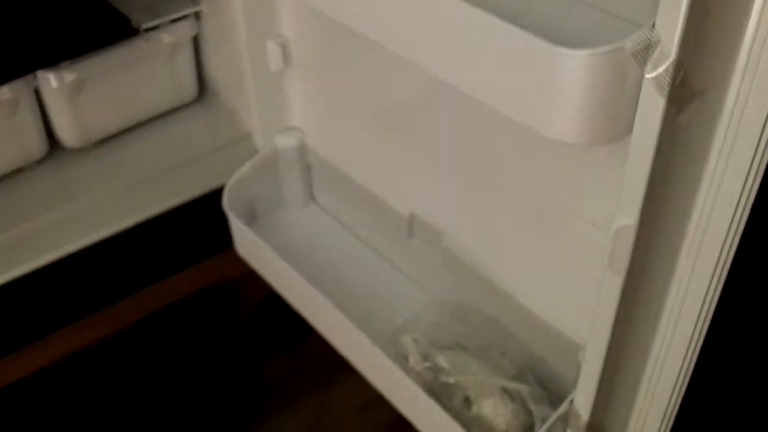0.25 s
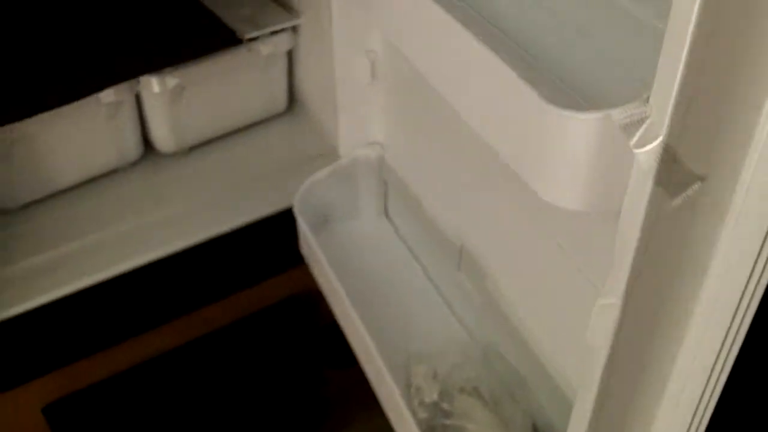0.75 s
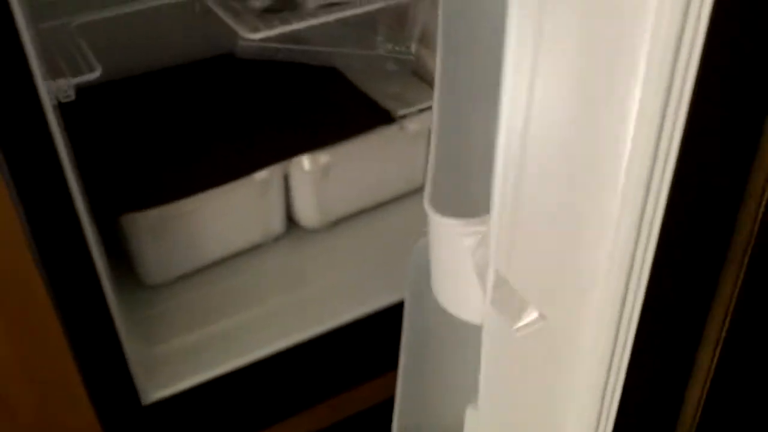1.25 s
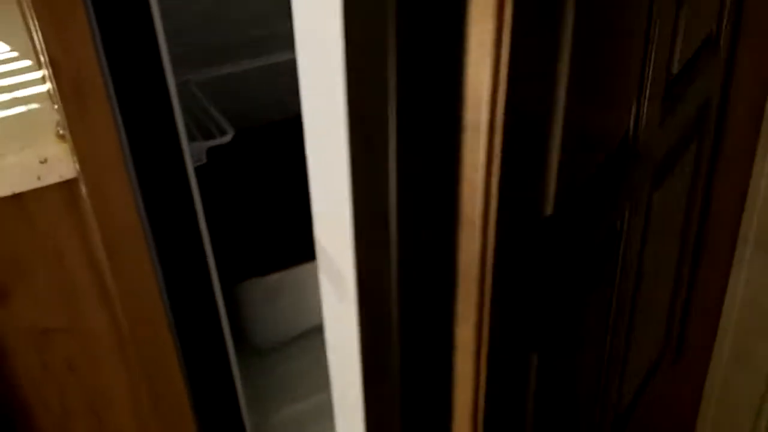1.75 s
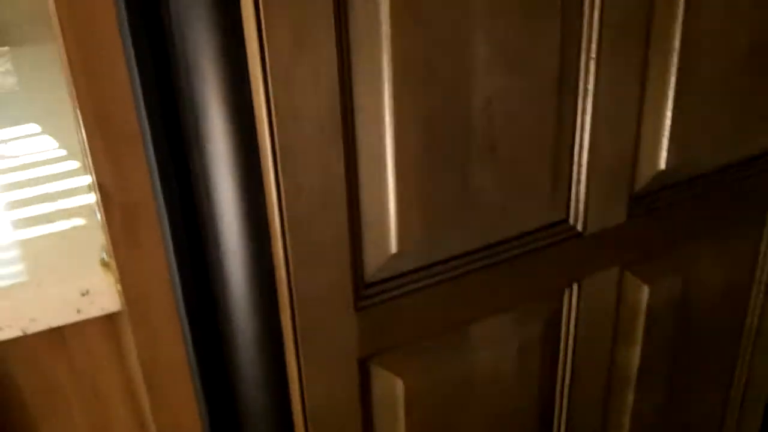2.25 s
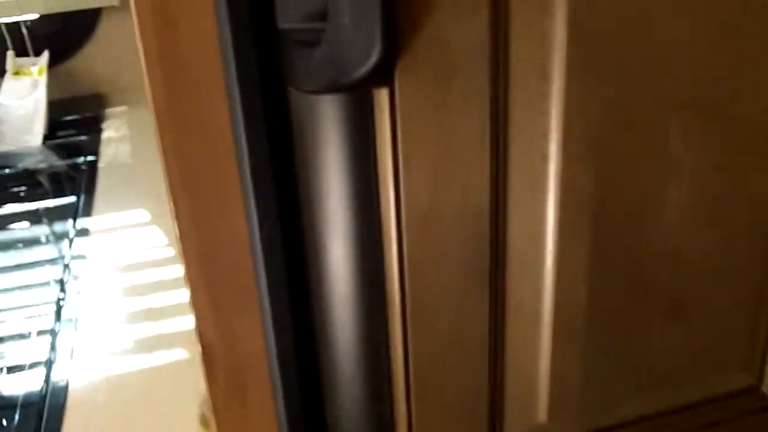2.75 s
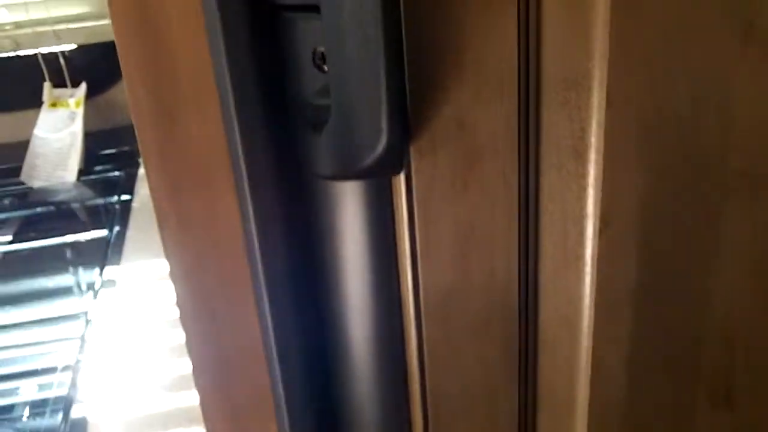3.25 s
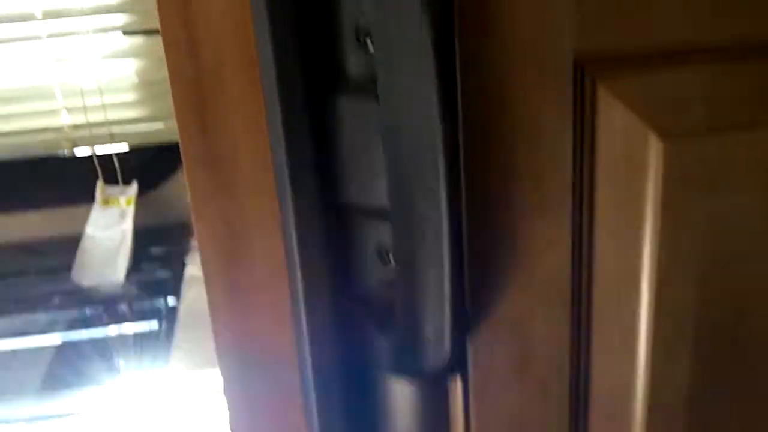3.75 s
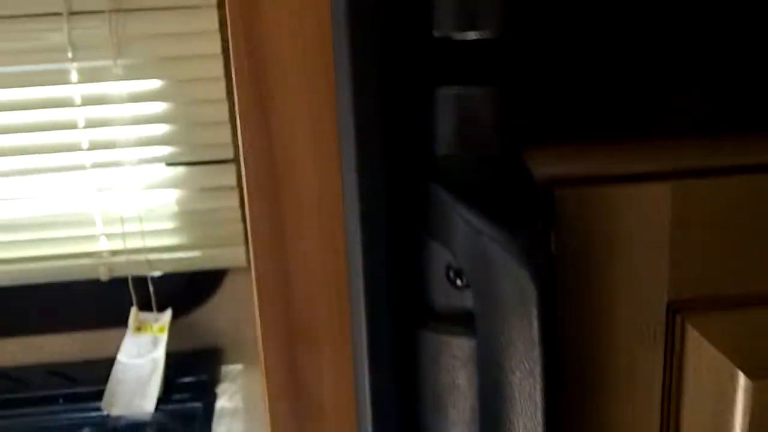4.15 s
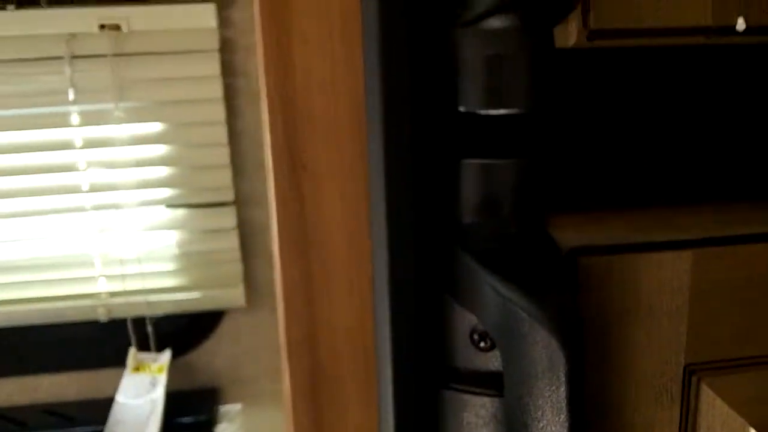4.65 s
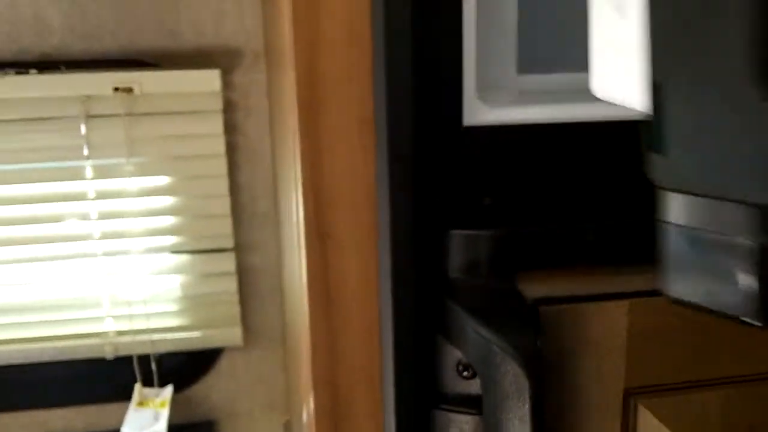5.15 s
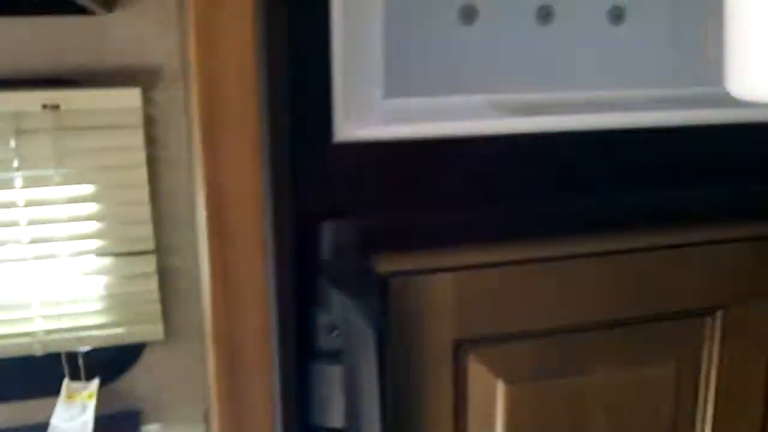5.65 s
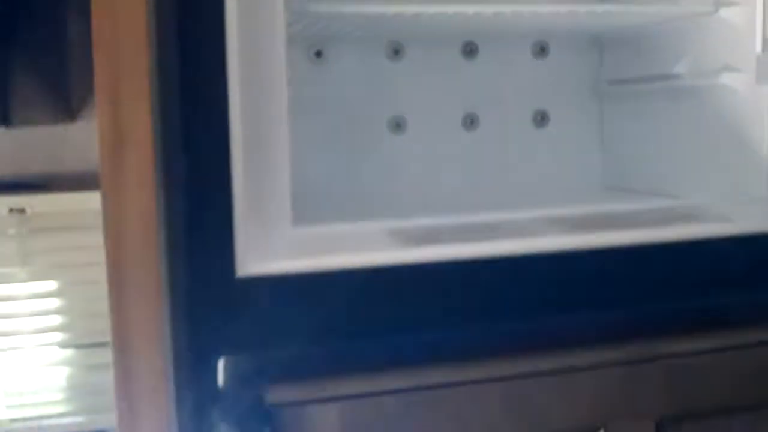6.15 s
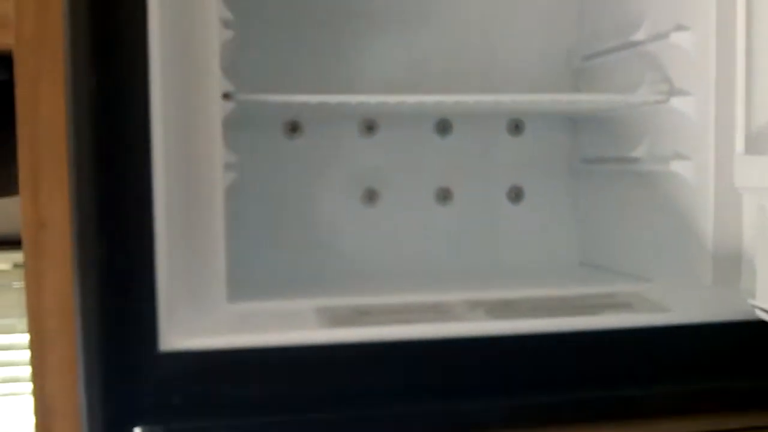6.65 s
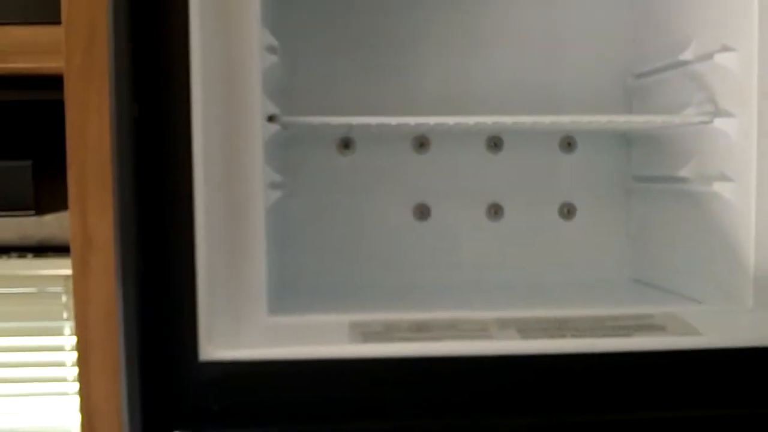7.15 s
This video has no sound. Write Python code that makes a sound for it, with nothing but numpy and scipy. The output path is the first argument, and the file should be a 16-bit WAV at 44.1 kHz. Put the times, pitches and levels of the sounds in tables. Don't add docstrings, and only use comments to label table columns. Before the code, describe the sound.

Close handheld microphone in a small furnished trailer, with soft fan wash, faint hum and low handling rumble. A plastic door bin knocks, the refrigerator door lands dully on its gasket, then a push seats it with a puff of air and a very sharp latch snap. A hand slides faintly up the handle, plastic clicks, the freezer seal peels open with a low thump, and soft knuckle taps land on the hollow liner.

```python
import sys
import numpy as np
from scipy import signal
from scipy.fft import rfft, irfft
from scipy.io import wavfile
from scipy.ndimage import uniform_filter1d

SR = 44100
rng = np.random.default_rng(int(sys.argv[2]) if len(sys.argv) > 2 else 0)


def unload_audio(sound):
    columns = np.transpose(np.atleast_2d(sound))
    steps = np.round(np.clip(columns, -1, 1) * 32767)
    wavfile.write(sys.argv[1], SR, steps.astype(np.int16))


def ratio_of_db(decibels):
    return 10 ** (np.asarray(decibels, float) / 20)


N = 327222
T = np.arange(N) / SR

# (frequency [Hz], level [dB], t60 [s])
BIN_MODES = [(538, -16.5, 0.13), (1080, -9, 0.028), (1700, -7, 0.007), (1840, 3.5, 0.0085),
             (2400, 8, 0.0089), (2700, -16, 0.0075), (3450, -26, 0.0042), (4180, 11.5, 0.0032),
             (4970, 4, 0.0065), (6120, -0.5, 0.0073), (8600, 0, 0.0028)]
DOOR_MODES = [(236, -14, 0.083), (350, -13.5, 0.043), (520, -11.5, 0.02), (714, -0.5, 0.01),
              (950, -3.5, .01), (1380, 4.5, 0.0096), (1800, 0, 0.01), (2610, -1.5, 0.01),
              (3490, 2.5, 0.008), (4450, -9, .008), (5870, -17, 0.0064)]
SEAT_MODES = [(230, -7, 0.047), (383, 2.5, 0.05), (610, -8, 0.023), (800, -6, .025), (1050, 0, 0.025),
              (1355, -1, 0.02), (1690, -9, 0.016), (4470, -6, 0.012), (5000, -8, .01), (5900, -2, .012),
              (6650, 1, 0.0084)]
CATCH_MODES = [(3800, 0, .014), (1500, -12, .01)]
LATCH_MODES = [(1300, -10, 0.017), (1680, -11, 0.022), (2260, -14, .012), (2800, -10, 0.014),
               (2950, -11.5, .012), (3190, -1.5, 0.019), (3510, 1.5, 0.016), (3630, -1.5, 0.018),
               (4240, -9.5, .010), (4610, -12.5, 0.012), (5130, -13.5, 0.011), (5650, 0.5, 0.0092),
               (5938, -4, 0.0062), (6600, -14, .006)]
LATCH_TOP_MODES = [(8640, -10, 0.0062), (10800, 0.5, 0.0037), (12000, 3.5, .008), (13470, 6, 0.0084),
                   (14700, 4, .006), (16200, 13, 0.0094)]
LINER_MODES = [(284, -7.5, 0.14), (336.6, 5, 0.11), (417, -28, 0.066), (525, -14, 0.026), (702, 0, 0.035),
               (806, 3, 0.04), (1200, -1, 0.025), (1488, 6.5, 0.022), (1950, 0, 0.022), (2770, -7, 0.018),
               (3600, -11.5, 0.0098), (4700, -11, .01)]

# (time [s], level [dB], hardness [dB/octave])
BIN_BLOWS = [
    (1.4727, -36, 2),
    (1.4738, -15, 0.5),
    (1.4821, -28, 1),
    (1.49, -38.5, -14),
]
DOOR_BLOWS = [(2.2343, -23, 2.5), (2.2357, -27, 1.5), (2.2375, -22.5, -2), (2.2396, -26.5, -4),
              (2.2415, -34, -1.5), (2.245, -32, 0), (2.2475, -30, 2), (2.25, -33, 4), (2.254, -37, -1),
              (2.2585, -36, 0), (2.282, -43, -2)]
SEAT_BLOWS = [
    (2.9714, -22, 0),
    (2.9748, -24.5, -0.41),
    (2.981, -32, 0),
    (2.995, -28, -1),
]
CATCH_BLOWS = [
    (2.94, -46, 0),
    (2.944, -48.5, 0),
    (2.9485, -44.5, 0),
    (2.9599, -34.5, 0),
    (2.966, -35, 0),
]
LATCH_BLOWS = [
    (3.2273, -27, -3),
    (3.2285, -2.5, 1),
    (3.2295, -8, 1),
    (3.2308, -12, -1),
    (3.2343, -7, 0),
    (3.2347, -9, 0),
    (3.2367, -17, -3.5),
]
LINER_TAPS = [
    (6.451, -32.5, 0.0),
    (6.612, -32, 0.0),
    (6.815, -32, 0.0),
    (7.079, -33, 0.0007),
    (7.216, -41.5, 0.0),
    (7.317, -33, 0.0),
]

# (frequency [Hz], level [dB/Hz])
BIN_RATTLE = [(150, -50), (250, -14), (530, -4.5), (887, -14.5), (2690, -10), (6470, -17.5), (7260, -21),
              (7800, -48), (10100, -82)]
DOOR_RATTLE = [(88, -39), (150, -12), (810, -2.5), (1150, -5.5), (1540, -8), (2620, -3.5), (6500, -18),
               (7800, -35), (10100, -71)]
LATCH_RATTLE = [(180, -43.5), (300, -23), (585, -30), (950, -22), (1400, -8), (2200, -10.5), (3400, -3.5),
                (4000, -11.5), (4900, -10), (5900, -14.5), (7600, -33.5), (10100, -70)]
LINER_RATTLE = [(140, -34), (230, -7), (329, 4), (691, -2), (960, -12), (1780, -13), (4310, -24.5),
                (7000, -59), (9100, -75)]
# (frequency [Hz], level [dB/Hz])
LATCH_ECHO = [(180, -40), (300, -16), (500, -24), (850, -13.5), (1400, -7), (2200, -6), (2900, -1),
              (3700, -3.5), (4600, -6.5), (5900, -9), (7600, -32.5), (10100, -70)]
# (frequency [Hz], level [dB/Hz])
PUFF_TAIL = [(150, -29.5), (250, 5), (310, -20.5), (485, -2.5), (675, -9), (1000, -4), (1350, -8.5),
             (2570, -19.5), (3500, -19), (4400, -13), (6290, -11.5), (7470, -23.5), (7800, -53),
             (10100, -83)]

# (time [s], peak [dB], main ring [Hz], second ring [Hz],
# second ring level [dB])
TICKS = [(2.413, -47, 2100, 1200, -5), (2.4921, -43, 2730, 1480, -11), (2.8446, -45, 2280, 517, -10),
         (2.8999, -37.5, 2940, 1650, -7), (3.5409, -38.5, 2090, 1800, -7), (4.187, -43.5, 2340, 950, -11),
         (4.2182, -34, 3600, 2350, -5.5), (4.3166, -48, 2220, 1200, -2), (4.365, -25.5, 3810, 1560, -11.5),
         (4.3652, -36, 6600, 1910, -4), (4.3712, -35, 3900, 5400, -14), (4.377, -38.5, 1500, 2470, -11),
         (4.388, -49, 4400, 3000, -6), (4.5824, -48, 2200, 3700, -6), (4.634, -36, 3570, 623, -16),
         (4.638, -42.5, 6240, 3830, -3), (4.6664, -47, 4800, 2980, -4), (4.7872, -41, 2430, 721, -11),
         (5.1637, -42.5, 2370, 4170, -11), (5.6755, -48, 3190, 574, -9), (7.216, -40, 2080, 606, -1),
         (7.217, -43.5, 3330, 4600, -5),
         (2.509, -43, 524, 3600, -10), (4.318, -46.5, 1310, 3600, -13), (4.536, -40, 1295, 3730, -19),
              (4.541, -41.5, 1000, 1300, 2), (4.547, -45, 1300, 903, 0), (4.644, -36, 748, 3650, -17),
              (4.7212, -39, 1320, 2180, -6), (4.727, -39, 600, 1000, -3), (4.7475, -31, 1000, 654, 6),
              (4.7515, -46, 1200, 520, 2)]
# (time [s], level [dB], frequency [Hz], t60 [s])
THUMPS = [(2.185, -37, 61, 0.14), (2.241, -49, 120, .2), (2.837, -33.5, 44.8, 0.16),
          (2.974, -34.5, 225, 0.2), (3.228, -39, 216, 0.42), (3.226, -36, 330, 0.056),
          (3.241, -41, 280, .07), (3.262, -31, 169, 0.059), (3.264, -39.5, 260, 0.094),
          (3.308, -43, 250, .1), (4.378, -52, 163.4, 0.34), (4.424, -44, 131, 0.12),
          (4.721, -49, 150.3, 0.57), (4.792, -24.5, 47.3, 0.11), (6.101, -36.5, 68, 0.17),
          (6.098, -43.5, 130, 0.11), (6.105, -37.5, 279.6, 0.061)]

# (peak time [s], level [dB], rise [s], fall [s], low body [dB])
GASKET = [(1.598, -52, 0.041, 0.047, -2), (2.19, -60, 0.026, .03, -18), (2.2, -53, 0.026, 0.04, -8),
          (2.844, -55, 0.013, 0.024, -13), (2.902, -46.5, 0.011, 0.021, -14),
          (2.885, -55.5, .01, .015, -4.5), (2.915, -51.5, .015, 0.017, -1), (2.93, -51, .015, 0.017, 2),
          (2.95, -47.5, 0.026, .02, -4.5), (2.966, -45.5, 0.03, 0.0044, 3.5),
          (4.638, -47.5, 0.0084, 0.02, 3), (4.69, -59, 0.12, 0.086, -5), (5.03, -67, 0.75, 0.075, 11.5)]
# (peak time [s], level [dB], rise [s], fall [s], low body [dB])
PEEL = [(4.711, -56.5, .03, .03, -11), (4.723, -47.5, .004, .04, 1), (4.742, -57, 0.027, 0.033, -6),
        (4.757, -48, 0.033, 0.027, -1), (4.768, -46.5, 0.027, 0.023, -14), (4.781, -46, .012, 0.022, -3),
        (4.787, -40.5, 0.014, 0.01, -4), (4.795, -46.5, 0.0072, 0.016, -1), (4.803, -57, .006, 0.023, -5)]
# (frequency [Hz], level [dB/Hz])
GASKET_TONE = [(180, -6), (300, -9), (490, -13.5), (653, -4.5), (834, -10), (943, -10.5), (1480, -9.5),
               (1810, -11.5), (4520, -16.5), (7800, -37), (10100, -46), (17200, -120)]
# (peak time [s], level [dB], rise [s], fall [s], brightness [dB])
SLIDE = [(3.85, -57.5, 0.034, 0.047, -21), (3.96, -71, 0.068, 0.089, -21), (4.08, -61, 0.19, 0.21, -4.5),
         (4.19, -58, .01, .009, -30.5), (5.675, -60, .02, 0.033, -8), (7.18, -64, 0.038, 0.027, -4),
         (7.216, -57.5, .005, 0.03, 1)]
# (frequency [Hz], width [Hz], level [dB])
HANDLE = [(2350, 400, -5), (2716, 300, -6.5), (3900, 1350, -5), (5000, 970, -2), (6020, 500, -5)]
# (time [s], frequency [Hz], level [dB])
SQUEAK = [(3.82, 2350, -91.5), (3.85, 2350, -71), (3.89, 2400, -68), (3.91, 2350, -78), (3.95, 2350, -69),
          (4.02, 2400, -66), (4.06, 2350, -68), (4.111, 2290, -62), (4.16, 2270, -80)]
# (peak time [s], level [dB], rise [s], fall [s], groan over drag [dB])
DRAG = [(2.28, -62.5, 0.012, 0.093, 11.5), (2.33, -75.5, 0.069, 0.089, 20), (2.925, -57.5, .03, .02, 2),
        (2.945, -52.5, 0.046, .02, 5.5), (4.235, -72.5, .006, 0.12, 14), (4.318, -78, 0.037, 0.056, 6),
        (4.395, -73.5, .006, 0.086, 20.5), (4.5, -72.5, 0.24, 0.51, 12)]
# (frequency [Hz], level [dB/Hz])
GROAN = [(90, -31), (140, 10), (300, 5), (450, -4), (900, -46)]

# (frequency [Hz], level [dB/Hz])
WASH = [(76, -47), (130, 0.5), (152, -0.5), (225, -12.5), (277, -3), (323, -6), (448, -7), (488, -8),
        (620, -8.5), (1000, -4.5), (1280, -8), (2180, -12.5), (5800, -21.5), (7900, -30.5), (10300, -85.5),
        (17400, -120)]
# (frequency [Hz], level [dB/Hz])
RUMBLE_TONE = [(4.7, -44), (8.0, 3.5), (27, -1), (49, -4), (92, -8), (114, -18), (151, -27), (200, -16.5),
               (260, -61.5), (440, -120)]
# (peak time [s], level [dB], rise [s], fall [s])
JOLTS = [(2.5, -48, 0.51, 0.24), (3.04, -41.5, 0.31, 0.62), (3.6, -54.5, .6, 1.6), (4.92, -47.5, .6, 0.54),
         (5.6, -54.5, 1, 0.52), (6.1, -50, 0.13, 0.59), (7.2, -55, 0.94, 0.73)]
# (time [s], level [dB])
HUM = [(0, -87), (.8, -72), (2, -67.5), (3.3, -67.5), (5.2, -71.5), (7.42, -85.5)]
# (frequency [Hz], t60 [s])
ROOM = [(100, 0.5), (300, 0.22), (1000, 0.33), (3000, 0.24), (6500, 0.18), (12000, 0.15)]
# (frequency [Hz], level [dB])
RESPONSE = [(6800, 0.5), (7300, -0.5), (7700, -12), (8600, -4.5), (14500, -19), (16500, -43), (17000, -76)]
# (frequency [Hz], level [dB/Hz])
HISS = [(7400, -43.5), (8000, -17.5), (8600, -6.5), (10200, -3.5), (11600, -3.5), (11900, -17), (12200, -3),
        (14600, -2.5), (15250, -6.5), (15500, -40.5)]

WASH_DB, SETTLE_DB, SETTLE_S = -59, -0.5, 0.12
DRIFT_DB_PER_S = 0.276
REST_DB = -56.5
HUM_HZ, HISS_DB = 221.4, -73.5
PUFF_S, PUFF_DB, PUFF_CRACK_DB = 2.9712, -10.5, -7.5
STROKE_DB = 20


def evened(x):
    return x / np.sqrt(np.mean(x ** 2) + 1e-20)


def read(points, hz):
    f, value = np.transpose(points)
    return np.interp(np.log(hz + 1), np.log(f + 1), value)


def add(mix, s, sound):
    part = mix[round(s * SR):][:len(sound)]
    part += sound[:len(part)]


def colour(x, points):
    hz = np.fft.rfftfreq(len(x), 1 / SR)
    return irfft(rfft(x) * ratio_of_db(read(points, hz)), len(x))


def resonate(x, hz, width_hz):
    turn = np.exp(2j * np.pi * np.cumsum(hz * np.ones(len(x))) / SR)
    pole = np.exp(-np.pi * width_hz / SR)
    return 2 * (turn * signal.lfilter([1 - pole], [1, -pole], x / turn)).real


def patchy(points, patch_db):
    a, b, patches = rng.standard_normal((N // 256 + 5, 513, 3)).T
    patches = uniform_filter1d(patches, size=10, axis=0)
    patches = evened(uniform_filter1d(patches, size=12, axis=1))
    z = (a + 1j * b) * ratio_of_db(patch_db * patches)
    noise = signal.istft(z, nperseg=1024, noverlap=768)[1][:N]
    return evened(colour(noise, points))


def swell(s, db, rise_s, fall_s):
    return ratio_of_db(db - STROKE_DB * np.maximum((s - T) / abs(rise_s), (T - s) / abs(fall_s)))


def strokes(rows, main, extra):
    return sum(swell(*row[:4]) * (main + ratio_of_db(row[4]) * extra) for row in rows)


def slips(per_s, size_db):
    size = ratio_of_db(size_db * np.minimum(rng.exponential(1, N), 4)) * rng.standard_normal(N)
    return size * (rng.random(N) < per_s / SR)


def room(x, lasting):
    taps = np.zeros(SR // 2)
    at = np.arange(120, len(taps) - 12, 12)
    taps[at + rng.integers(0, 12, len(at))] = rng.choice([-1., 1.], len(at))
    hz, t, z = signal.stft(taps, SR, nperseg=256)
    decay = ratio_of_db(-60 * t / lasting / read(ROOM, hz)[:, None])
    tail = signal.istft(z * decay, SR, nperseg=256)[1]
    return signal.oaconvolve(x, tail / np.linalg.norm(tail))[:N]


def struck(modes, blows, rattle, rattle_db, rattle_s, rise_s, wet_db, luck_db=-2.5, echo=None):
    near, far, t = np.zeros(N), np.zeros(N), T[:SR // 8]
    hz, db, t60 = np.transpose(modes)[:, :, None]
    rise = 1 - np.exp(-t / rise_s)
    click = colour(1. * (np.arange(1024) == 200), echo or rattle)
    click /= np.linalg.norm(click)
    for s, blow_db, hard_db in blows:
        luck = luck_db * rng.standard_normal((2, len(modes), 1))
        level = ratio_of_db(db + hard_db * np.log2(hz / 1500) + luck[0] - 60 * t / t60)
        ring = (level * np.sin(2 * np.pi * hz * (1 + 0.0027 * luck[1]) * t)).sum(0) * rise
        shake = evened(colour(rng.standard_normal(len(t)), rattle)) * np.exp(-t / rattle_s) * rise
        add(near, s, ratio_of_db(blow_db) * (ring / abs(ring).max() + ratio_of_db(rattle_db) * shake))
        add(far, s, ratio_of_db(blow_db + wet_db) * click)
    return np.array([near, far])


def background():
    wash_db = WASH_DB - 3.0 + SETTLE_DB * np.exp(-T / SETTLE_S) + DRIFT_DB_PER_S * T
    wash = ratio_of_db(wash_db) * patchy(WASH, 0.35)
    jolt_power = sum(swell(*row) ** 2 for row in JOLTS)
    rumble = patchy(RUMBLE_TONE, 1.2) * np.sqrt(ratio_of_db(REST_DB) ** 2 + jolt_power)
    hum = evened(resonate(rng.standard_normal(N), HUM_HZ, 10.0))
    return wash + rumble + ratio_of_db(np.interp(T, *np.transpose(HUM))) * hum


def thumps():
    out, t = np.zeros(N), T[:SR // 2]
    for s, db, hz, t60 in THUMPS:
        swing = np.sin(2 * np.pi * hz * t) * (1 - np.exp(-t / 0.0048))
        add(out, s, -ratio_of_db(db - 60 * t / t60) * swing)
    return out


def ticks():
    out = np.zeros((2, N))
    for s, db, main_hz, other_hz, other_db in TICKS:
        rattle = sorted([(250, -30), (other_hz, other_db), (main_hz, 0), (7000, -11), (9000, -30)])
        rings = [(main_hz, 0, .005), (other_hz, other_db, .012),
                 (main_hz * 1.64, -12, .004), (main_hz * 0.75, -8, .005)]
        out += struck(rings, [(s, db, 0)], rattle, -13.0, 0.0019, 0.00034, -1.5, luck_db=0.5)
    return out


def drag():
    scrape = resonate(slips(3700, 3.1), 3540, 350)
    return strokes(DRAG, evened(scrape), patchy(GROAN, 2.65))


def squeak():
    s, hz, db = np.transpose(SQUEAK)
    pitch_hz = np.interp(T, s, hz)
    ring = resonate(resonate(rng.standard_normal(N), pitch_hz, 90), pitch_hz, 90)
    return ratio_of_db(np.interp(T, s, db, -120, -120)) * evened(ring)


def slide():
    rub = slips(13000, 1.8)
    rings = [ratio_of_db(db) * evened(resonate(resonate(rub, hz, width_hz), hz, width_hz))
             for hz, width_hz, db in HANDLE]
    return strokes(SLIDE, evened(sum(rings[:3])), sum(rings[3:]))


def gasket():
    rub = colour(slips(16000, 1.2), GASKET_TONE)
    body = signal.sosfilt(signal.butter(2, 1800, fs=SR, output="sos"), rub)
    return strokes(GASKET + PEEL, evened(rub - body), evened(body))


def puff():
    t = T - PUFF_S
    build = np.exp(np.minimum(t, 0) / 0.0014) * (t < 0)
    suction = -.45 * np.exp(-np.maximum(t, 0) / .02) * np.cos(2 * np.pi * 11.8 * t) * (t >= 0)
    burst = -np.sin(2 * np.pi * 4600 * t) * np.exp(-(t / 0.00016) ** 2)
    jolt = ratio_of_db(PUFF_DB) * (build + suction) + ratio_of_db(PUFF_CRACK_DB) * 1.1 * burst
    jolt = colour(jolt, [(7500, -1.5), (9000, 4.5), (11000, -5.0), (13500, 4), (16000, -5.0)])
    tail = colour(room(1. * (np.arange(N) == round(PUFF_S * SR)), 1.8), PUFF_TAIL)
    return jolt + ratio_of_db(2) * tail


def knocks():
    return (struck(BIN_MODES, BIN_BLOWS, BIN_RATTLE, -15.5, 0.0058, 0.00075, 1.6)
            + struck(DOOR_MODES, DOOR_BLOWS, DOOR_RATTLE, -5.5, 0.0051, 0.00045, 5.6)
            + struck(LINER_MODES, LINER_TAPS, LINER_RATTLE, -10.5, 0.017, 0.00066, 10.4)
            + struck(CATCH_MODES, CATCH_BLOWS, LATCH_RATTLE, -18, 0.0015, 0.00065, 12)
            + struck(SEAT_MODES, SEAT_BLOWS, PUFF_TAIL, -5.0, 0.0025, 0.00016, 4.8))


def latch():
    snap, echo = struck(LATCH_MODES, LATCH_BLOWS, LATCH_RATTLE, -11, 0.0027, .0002, -3,
                        luck_db=2.0, echo=LATCH_ECHO)
    top_blows = [(3.2283, 0.5, -3.5), (3.2342, -18.5, -5.5)]
    snap += struck(LATCH_TOP_MODES, top_blows, LATCH_RATTLE, -52.0, .001, .0001, -30, luck_db=0.5)[0]
    return snap, echo


def scene():
    near, far = knocks() + ticks()
    snap, echo = latch()
    rubbing = gasket() + slide() + drag() + squeak()
    hits = near + room(far + ratio_of_db(-11.0) * rubbing, 0.84) + snap + room(echo, 0.47)
    hall = ratio_of_db(-5.5) * room(colour(echo, [(1200, -3.5), (4300, 0.5), (7000, -0.5)]), 2.2)
    return (hits + hall + puff() + rubbing + thumps() + background())[None]


def starve(x):
    hz, t, z = signal.stft(x, SR, nperseg=512)
    patch = uniform_filter1d(rng.standard_normal(z.shape), size=3, axis=0)
    patch = evened(uniform_filter1d(patch, size=9, axis=1))
    faint = abs(z) < ratio_of_db(-92)
    lost = faint * (patch > 2.2 * abs(hz[:, None] - 7900) / 900 - .9)
    return signal.istft(z * ~lost, SR, nperseg=512)[1][:N]


def thin_hiss(heard):
    hz, t, z = signal.stft(ratio_of_db(HISS_DB) * patchy(HISS, 2.1), SR, nperseg=1024)
    loud_db = 10 * np.log10(abs(uniform_filter1d(heard ** 2, size=2000, origin=600)) + 1e-12)
    over_db = np.maximum(np.interp(t, T, loud_db) + 42.5, 0)
    kept = hz[:, None] < np.maximum(15600 - 330 * over_db, 12100)
    strong = abs(z) > .75 * uniform_filter1d(abs(z), size=9, axis=0)
    return signal.istft(z * kept * strong, SR, nperseg=1024)[1][:N]


def top_cut(x):
    return signal.sosfilt(signal.butter(12, 16820, fs=SR, output="sos"), x)


def record(dry):
    heard = colour(dry[0], RESPONSE)
    mix = starve(heard + thin_hiss(heard))[None]
    return top_cut(mix)


dry = scene()
out = record(dry)
unload_audio(out)
```